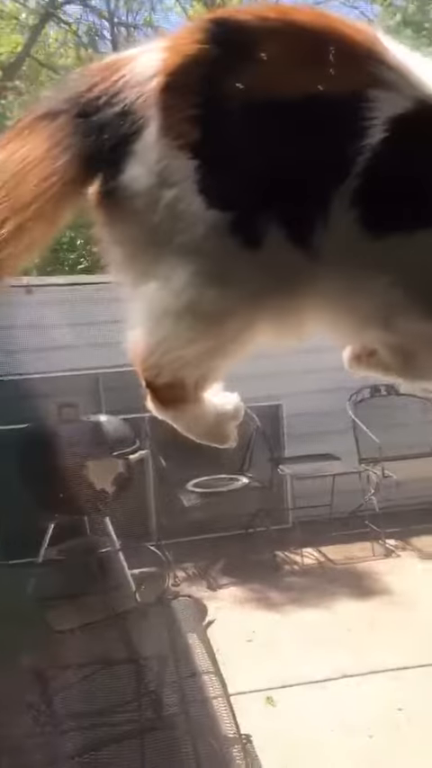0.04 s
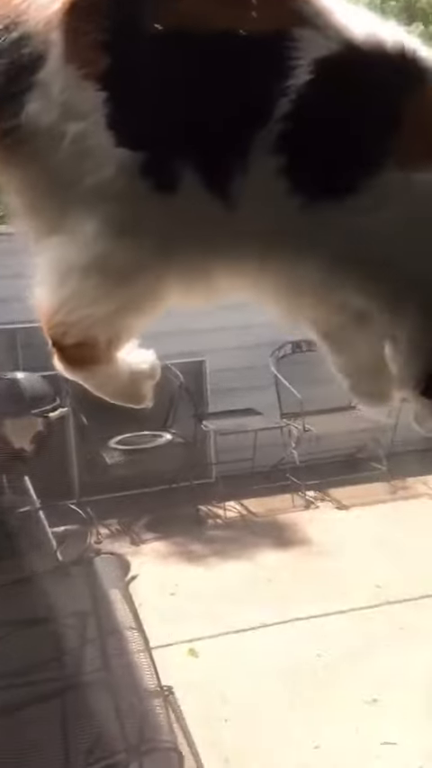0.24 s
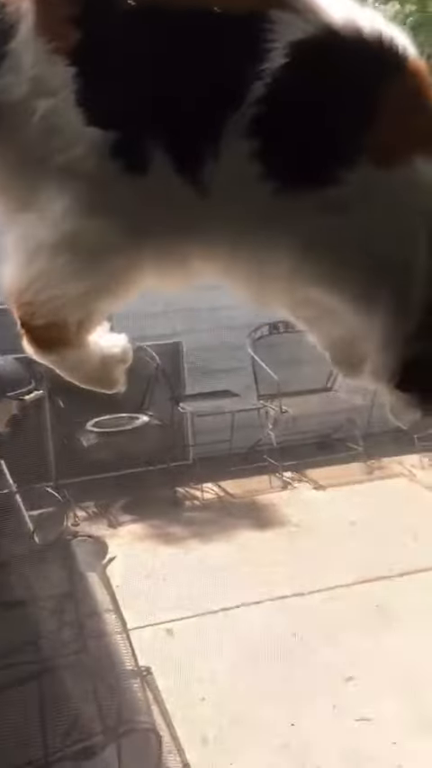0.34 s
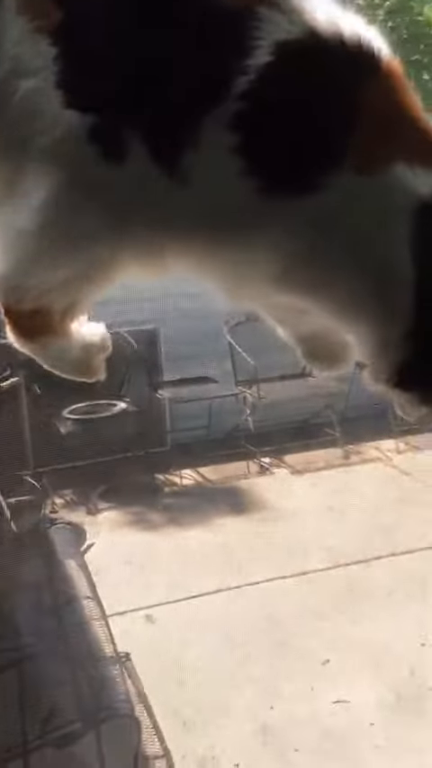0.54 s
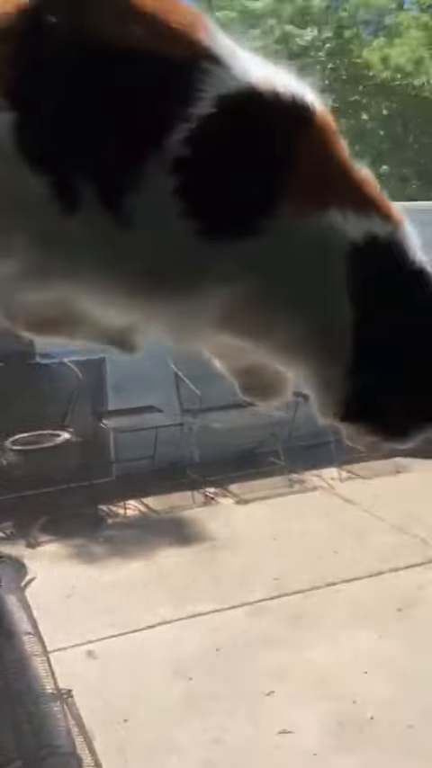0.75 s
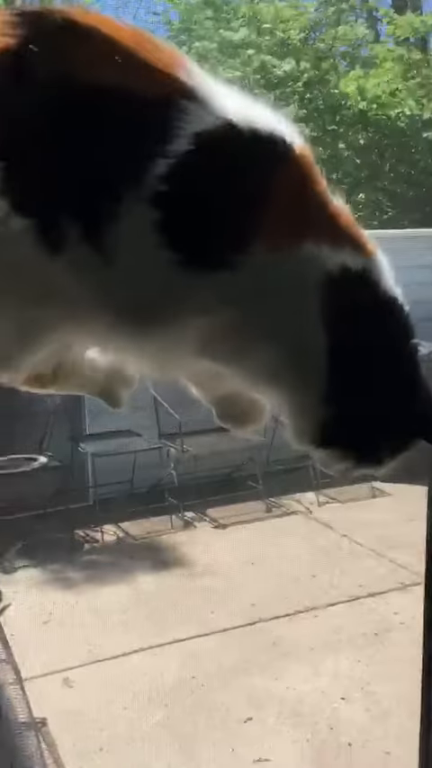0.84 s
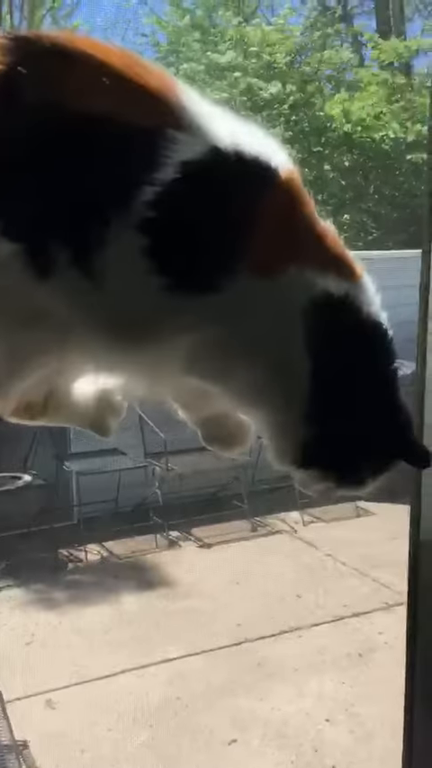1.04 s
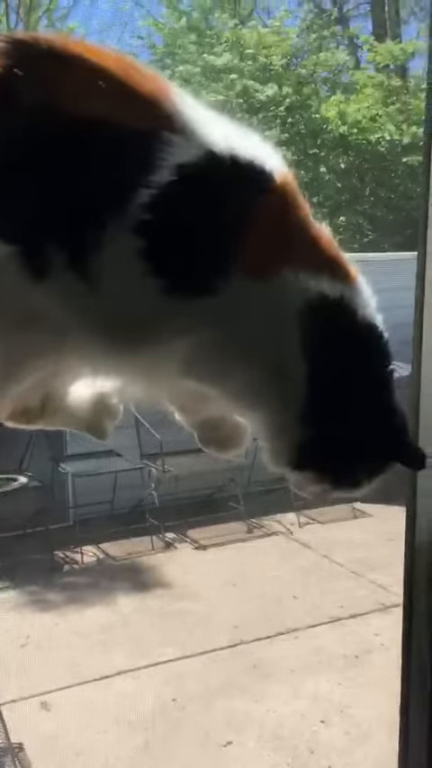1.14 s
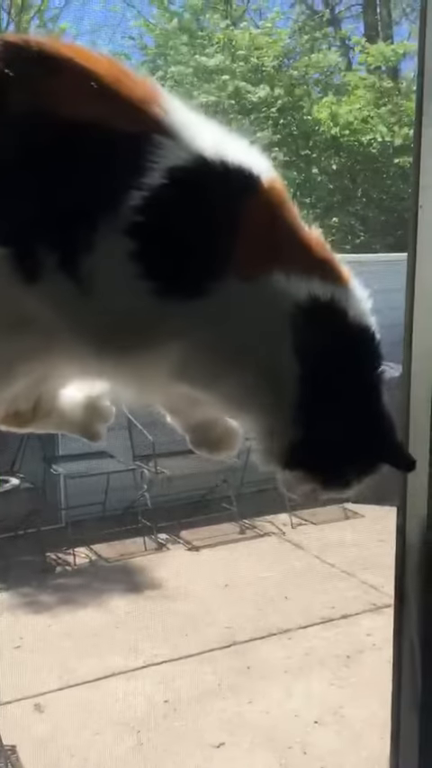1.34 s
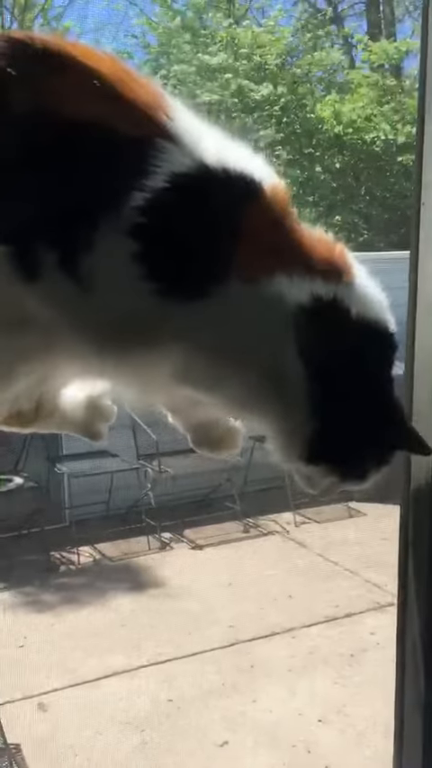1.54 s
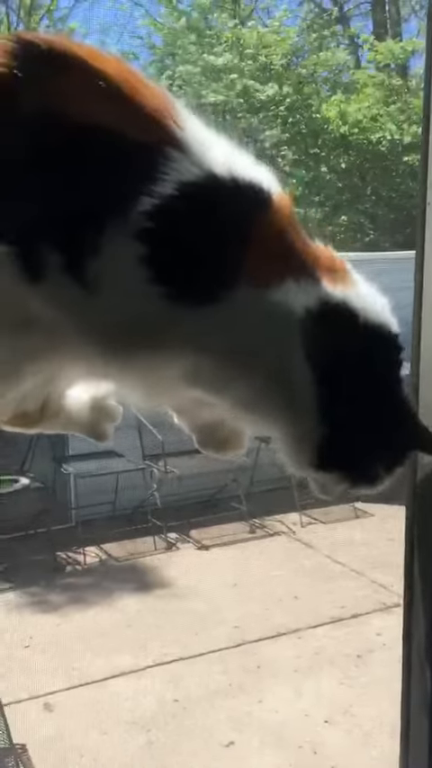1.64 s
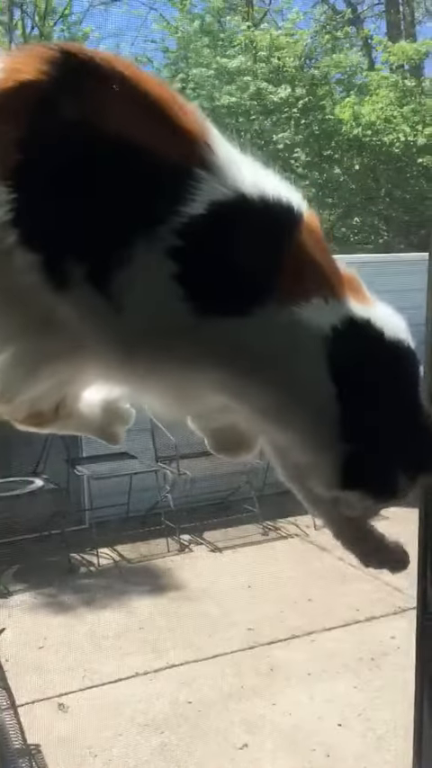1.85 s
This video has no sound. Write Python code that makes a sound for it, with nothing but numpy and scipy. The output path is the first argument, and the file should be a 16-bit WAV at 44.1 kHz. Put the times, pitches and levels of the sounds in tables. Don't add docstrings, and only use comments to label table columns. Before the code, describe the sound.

Cat claws snap off a taut window screen, close to a phone. After quiet low hum and hiss, the loudest springy click hits at 0.22 s, with a dull frame shudder. Faint ticks and light scratching cluster from 0.73 to 0.98 s, ending in a medium pluck. A tiny touch comes near 1.39, a double snap at 1.59 and 1.63, the second loud, then faint scrapes around 1.8. Short small-room echo.

```python
import sys
import numpy as np
from scipy import signal
from scipy.fft import rfft, irfft
from scipy.io import wavfile
from scipy.ndimage import uniform_filter1d

SR = 44100
rng = np.random.default_rng(int(sys.argv[2]) if len(sys.argv) > 2 else 0)


def gain_from_db(level_db):
    decades = np.asarray(level_db, float) / 20
    return 10 ** decades


def unload_audio(sound):
    columns = np.transpose(np.atleast_2d(sound))
    steps = np.round(np.clip(columns, -1, 1) * 32767)
    wavfile.write(sys.argv[1], SR, steps.astype(np.int16))


N = 83790
T = np.arange(N) / SR
SIZE = 16384
HZ = np.maximum(np.arange(SIZE // 2 + 1) * SR / SIZE, 1.0)

# freq_hz, density_db
RUMBLE_SPECTRUM = [(15, -36), (25, -11), (59, 3.5), (172, -12.5), (205, -6), (262, -12.5), (294, -9.5),
                   (376, -18.5), (800, -40.5), (1040, -59), (1760, -120)]
HISS_SPECTRUM = [(210, -37), (350, -7), (404, -7), (791, -8), (1040, -6), (2130, -16), (2460, -21.5),
                 (4240, -27), (16000, -37.5)]
# freq_hz, width_hz, level_db
HUM_LINES = [(50.3, 5.2, -58.5), (74.6, 7.7, -65.5), (208, 14, -72.5), (306, 33, -69), (403, 17.8, -72),
             (5460, 162, -90)]
# start_s, level_db, pitch_hz, tick_db, path_m (distance to the frame)
CLAW_SNAPS = [
    (0.2157, -7, 1407, -17.5, .08),
    (0.7708, -39, 1494, -17.5, 0.2),
    (.9882, -21.5, 1434, -12, 0.27),
    (1.5940, -25.5, 1400, -19, 0.41),
    (1.6335, -11, 1426, -21, 0.1255),
    (1.818, -45.5, 1474, -27, 0.43),
]
# spike_db, upper_partials_db, lower_partials_db
SNAP_RELEASES = [
    (1.5, 3.5, 0.5),
    (0.5, 3, 15.5),
    (-5, 1, 3),
    (7, 2, 0),
    (6.5, -1.5, -3),
    (-4, 5.5, 3),
]
# start_s, level_db, pitch_hz, tick_db, path_m
CLAW_TOUCHES = [
    (0.73, -64, 1530, 3.5, .6),
    (0.735, -48.5, 1660, -28, 0.23),
    (0.898, -56, 1390, -8, .6),
    (1.388, -53, 1470, -29, 0.262),
    (1.853, -52, 1270, -34, 0.39),
    (.748, -51, 1530, -32, 0.16),
    (0.756, -51, 1490, -31, 0.23),
]
# freq_hz, width_hz, level_db
TICK_RESONANCES = [(2500, 290, -6), (3310, 270, 2), (4510, 550, 8), (5450, 300, 6.5), (6240, 330, -1),
                   (8610, 1130, -6), (13300, 3600, -24)]
# freq_hz, level_db
SPIKE_COLOUR = [(1000, -21.5), (4000, 0), (9000, 4), (10500, -10.5), (13000, 0), (15500, -8), (17000, -11)]
# freq_hz, level_db, t60_s
TIP_MODES = [(3330, 10.5, 0.0077), (4477, 8.5, 0.016), (5580, 7.5, 0.012), (7176, 1.5, .015)]
# pitch_multiple, level_db, t60_s
MESH_PARTIALS = [(0.301, -31.5, 0.013), (0.42, -38.5, 0.035), (0.573, -26, 0.042), (0.72, -26.5, 0.024),
                 (0.852, -9, 0.0079), (1.0, 3.5, 0.00465), (1.172, -7.5, 0.0027), (1.369, -12.5, 0.015),
                 (1.558, -14, 0.04)]
# freq_hz, level_db, t60_s
WIRE_MODES = [(813, -47, 0.092), (1400, -43, 0.06), (2080, -37, 0.05), (2180, -25, 0.077),
              (4036, -21.5, 0.046), (4786, -50, 0.034), (5300, -28, 0.053), (5470, -46, .045),
              (6550, -38, 0.19), (7220, -48, 0.079)]
# start_s, level_db, pitch_factor, length_factor
FRAME_SHUDDERS = [
    (.222, -43, 1.036, 1.0),
    (0.782, -46.5, 0.84, 0.35),
    (1.638, -58.5, 1.5, 1),
]
# freq_hz, level_db, t60_s
FRAME_MODES = [(144, -0.5, 0.12), (198.7, 2.5, 0.28), (237, -3, 0.48), (270.3, 5.5, 0.29),
               (288.3, 0.5, 0.27)]
# freq_hz, t60_s
ROOM_DECAY = [(300, 0.5), (1400, 0.25), (4000, 0.26), (9000, 0.26), (15000, 0.05)]
# freq_hz, level_db
ROOM_LEVEL = [(300, 15), (800, -1.5), (1400, -13), (2200, -2), (3200, -10), (5000, -12), (8000, -16.5),
              (15000, -12)]
# start_s, length_s, level_db
CLAW_DRAGS = [
    (0.734, 0.12, -66),
    (0.841, 0.14, -60.5),
    (1.345, 0.057, -72.5),
    (1.803, 0.074, -68),
]

RUMBLE_DB, HISS_DB, HISS_TOP_HZ = -55, -62.5, 15900
MOTOR_HZ, MOTOR_DB, MOTOR_WAVER_DB = 204, -60.5, 0.5
TICK_T60_S, TICK_SPREAD_PER_M = 0.0456, 1.35
SPIKE_GAIN, SPIKE_CLEAN, SPIKE_S, SPIKE_BLUNT_PER_M = 3.3, 2.24, 0.00058, 4.2
TIP_FAR_DB_PER_M = -26.5
ATTACK_S, HOLD_S, MESH_SCATTER_DB, FAR_BASS_DB_PER_M = 0.00059, 0.002816, 2.5, 39.5
RETURN_S, RETURN_DB, RETURN_SCATTER = 0.0039, -8.5, 0.093
LAG_S_PER_M, LAG_POWER = 0.008, 1.8
WIRE_RISE_S, WIRE_BUZZ, BUZZ_HZ, WIRE_FAR_DB_PER_M = 0.0076, 1.27, 205, -19
FRAME_RISE_S = 0.0043
ROOM_FEED_S, ROOM_FEED_DB, ROOM_GAP_S = 0.0013, 6.5, 0.0029
DRAG_GRAIN_DB = 4
LOW_CUT_HZ, TOP_HZ = 33.3, 16750


def read(table, hz):
    freq, value = np.array(table).T
    return np.interp(np.log(hz), np.log(freq), value)


def unit(x):
    return x / np.sqrt(np.mean(x ** 2))


def fade(t, t60):
    return gain_from_db(-60 * t / np.clip(t60, 0.003, 0.45))


def rise(t, time_s):
    return 1 - np.exp(-t / time_s)


def walk(rate_hz, size=N):
    hold = int(SR / rate_hz)
    levels = rng.standard_normal(size=512)[np.arange(size) // hold]
    return uniform_filter1d(uniform_filter1d(levels, hold), hold)


def bands(size):
    hz = np.maximum(np.arange(size // 2 + 1) * SR / size, 1.0)
    noise = rfft(rng.standard_normal(size))
    for k in range(30):
        triangle = np.clip(1 - np.abs(3 * np.log2(hz / 25) - k), 0, 1)
        yield 25 * 2 ** (k / 3), irfft(noise * triangle, size)


def rings(modes, sizes, hold_s=0.0):
    t = T[:SIZE]
    held = np.maximum(t - hold_s, 0)
    return sum(size * gain_from_db(db) * np.sin(2 * np.pi * hz * t) * fade(held, t60)
               for (hz, db, t60), size in zip(modes, sizes))


def causal(db):
    cepstrum = irfft(np.log(gain_from_db(db)), SIZE)
    cepstrum[1:SIZE // 2] *= 2
    cepstrum[SIZE // 2 + 1:] = 0
    return np.exp(rfft(cepstrum))


def add(out, at_s, x):
    i = int(at_s * SR)
    out[i:i + len(x)] += x[:N - i]


def house():
    low, high, swell = 0, 0, walk(2.43)
    for hz, band in bands(N):
        if hz < 500:
            low = low + band * gain_from_db(read(RUMBLE_SPECTRUM, hz) + 3.04 * walk(15.0))
        else:
            high = high + band * gain_from_db(read(HISS_SPECTRUM, hz) + 0.2 * swell + 0.885 * walk(11.56))
    freq = np.arange(N // 2 + 1) * SR / N
    high = irfft(rfft(high) * np.where(freq < HISS_TOP_HZ, 1, 0.03), N)
    hum = 0
    for hz, width, db in HUM_LINES:
        resonance = 1 / (1 + (2 * (freq - hz) / width) ** 2)
        hum = hum + gain_from_db(db) * unit(irfft(rfft(rng.standard_normal(N)) * resonance, N))
    return unit(low) * gain_from_db(RUMBLE_DB) + unit(high) * gain_from_db(HISS_DB) + hum


def motor():
    return gain_from_db(MOTOR_DB + MOTOR_WAVER_DB * walk(7.7)) * np.sin(2 * np.pi * MOTOR_HZ * T)


def claw_tick(path_m, spike_db):
    t = T[:SIZE]
    noise = rng.standard_normal(SIZE)
    impulse = 0.5 * noise + SPIKE_CLEAN * (t == 0)
    spike = impulse * SPIKE_GAIN * np.exp(-t / SPIKE_S - SPIKE_BLUNT_PER_M * path_m)
    spike = rfft(spike) * causal(read(SPIKE_COLOUR, HZ) + spike_db)
    scrape = rfft(noise * fade(t, TICK_T60_S * (1.32 + TICK_SPREAD_PER_M * path_m)))
    colour = sum(gain_from_db(db) / (1 + 1j * (HZ - f * f / HZ) / (1.47 * width)) ** 2
                 for f, width, db in TICK_RESONANCES)
    scatter_db = 0.94 * rng.standard_normal(len(TIP_MODES))
    tip = rings(TIP_MODES, gain_from_db(scatter_db + TIP_FAR_DB_PER_M * path_m)) * rise(t, ATTACK_S)
    return irfft(spike + scrape * colour, SIZE) + tip


def mesh_ring(pitch_hz, path_m, upper_db, lower_db):
    partials = []
    for k, db, t60 in MESH_PARTIALS:
        if k < 0.8:
            db = db + FAR_BASS_DB_PER_M * path_m + lower_db
        if k > 1.3:
            db = db + upper_db
        partials.append((k * pitch_hz, db, t60))
    sizes = gain_from_db(MESH_SCATTER_DB * rng.standard_normal(len(partials)))
    return rings(partials, sizes, HOLD_S) * rise(T[:SIZE], ATTACK_S)


def frame_returns():
    delays_s = np.cumsum(RETURN_S * (1 + RETURN_SCATTER * rng.standard_normal(4)))
    return 1 + sum(gain_from_db(RETURN_DB * (k + 1.0)) * np.exp(-2j * np.pi * HZ * delay)
                   for k, delay in enumerate(delays_s))


def dispersion(path_m):
    lag = (np.maximum(HZ, 250) / 1000) ** -LAG_POWER
    turns = LAG_S_PER_M * np.clip(path_m, 0, 1) * np.cumsum(lag) * SR / SIZE
    return np.exp(-2j * np.pi * turns)


def wire_ring(path_m):
    buzz = 1 + WIRE_BUZZ * walk(BUZZ_HZ, size=SIZE)
    sizes = gain_from_db(3.0 * rng.standard_normal(len(WIRE_MODES)) + WIRE_FAR_DB_PER_M * path_m)
    return rings(WIRE_MODES, sizes) * rise(T[:SIZE], WIRE_RISE_S) * buzz


def snap(pitch_hz, tick_db, path_m, spike_db=0, upper_db=0, lower_db=0):
    tick = claw_tick(path_m, spike_db)
    mesh = rfft(mesh_ring(pitch_hz, path_m, upper_db, lower_db)) * frame_returns()
    wave = (mesh + rfft(wire_ring(path_m))) * dispersion(path_m)
    return irfft(wave, SIZE) + gain_from_db(tick_db + 4.0) * tick


def claws():
    out, feed = np.zeros(N), np.zeros(N)
    half = SIZE // 2
    releases = SNAP_RELEASES + [(0, 0, 0)] * len(CLAW_TOUCHES)
    for event, release in zip(CLAW_SNAPS + CLAW_TOUCHES, releases):
        start_s, db, pitch_hz, tick_db, path_m = event
        x = gain_from_db(db - 6.0) * snap(pitch_hz, tick_db, path_m, *release)[:half]
        feed_s = ROOM_FEED_S * (1 + 10.8 * path_m)
        add(out, start_s, x)
        add(feed, start_s, x * gain_from_db(ROOM_FEED_DB) * np.exp(-T[:half] / feed_s))
    return out, feed


def room(x):
    t = T[:SIZE]
    tail = sum(band * gain_from_db(read(ROOM_LEVEL, hz)) * fade(t, read(ROOM_DECAY, hz)) for hz, band in bands(SIZE))
    build_up = 1 - np.exp(-(t / ROOM_GAP_S) ** 2)
    return signal.fftconvolve(x, tail * build_up / 30)[:N]


def frame():
    out = np.zeros(N)
    signs = (-1.0) ** np.arange(len(FRAME_MODES))
    for start_s, db, pitch, length in FRAME_SHUDDERS:
        modes = [(hz * pitch, level, t60 * length) for hz, level, t60 in FRAME_MODES]
        add(out, start_s, gain_from_db(db) * rings(modes, signs) * rise(T[:SIZE], FRAME_RISE_S) ** 2)
    return out


def drags():
    push = sum(gain_from_db(db) * np.sin(np.pi * np.clip((T - start_s) / length_s, 0, 1))
               for start_s, length_s, db in CLAW_DRAGS)
    grains = rng.standard_normal(N) * gain_from_db(DRAG_GRAIN_DB * rng.exponential(size=N))
    tiny_snap = snap(1437, -21.5, 0.23)[:SIZE // 4]
    return push * unit(signal.fftconvolve(grains, tiny_snap)[:N])


def scene():
    background = house() + motor()
    near, feed = claws()
    slide = drags()
    return (background + near + slide + room(feed + slide) + frame())[None]


def band_limit(x):
    return signal.sosfilt(signal.butter(12, 16880, fs=SR, output="sos"), x)


def record(dry):
    low_cut = signal.butter(4, LOW_CUT_HZ, "high", fs=SR, output="sos")
    top_cut = signal.ellip(8, 0.2, 70, TOP_HZ, fs=SR, output="sos")
    mix = signal.sosfilt(top_cut, signal.sosfilt(low_cut, dry))
    return band_limit(mix)


dry = scene()
out = record(dry)
unload_audio(out)
```